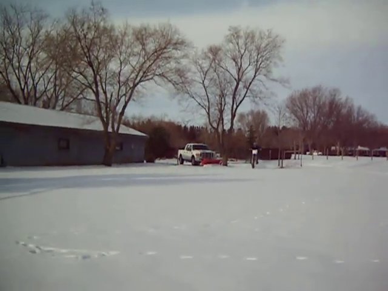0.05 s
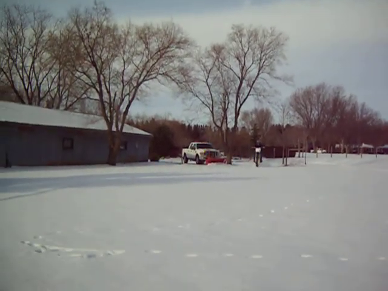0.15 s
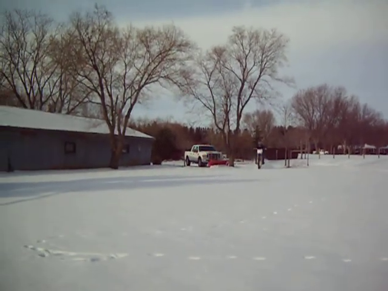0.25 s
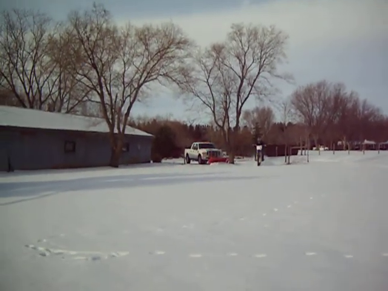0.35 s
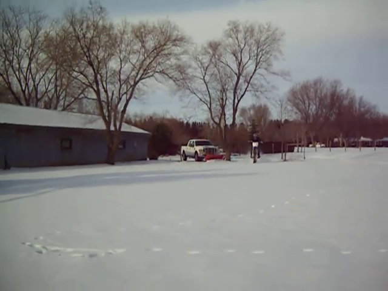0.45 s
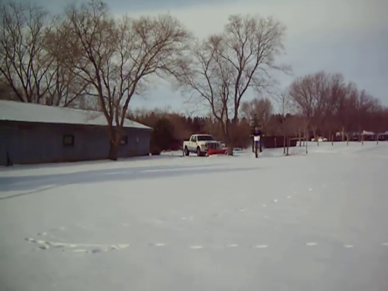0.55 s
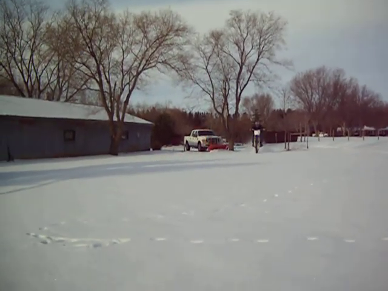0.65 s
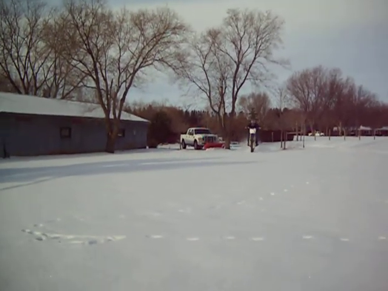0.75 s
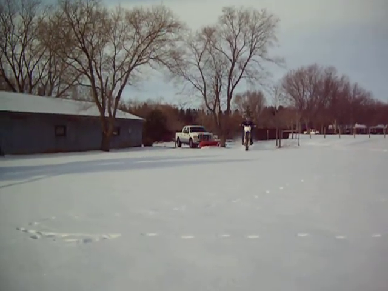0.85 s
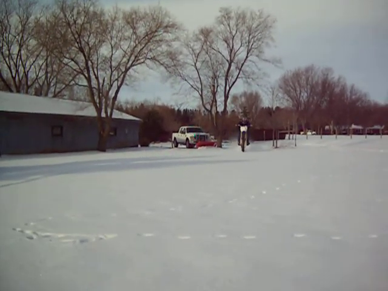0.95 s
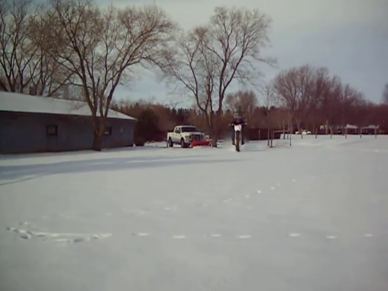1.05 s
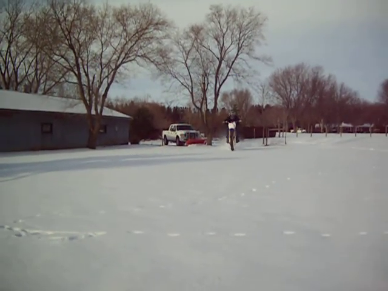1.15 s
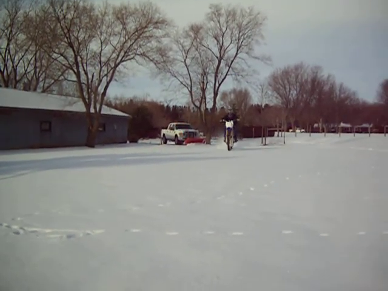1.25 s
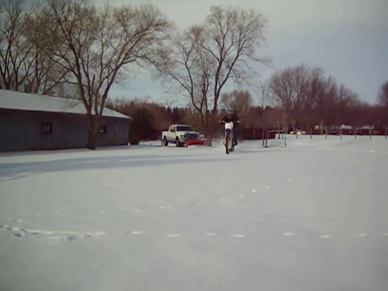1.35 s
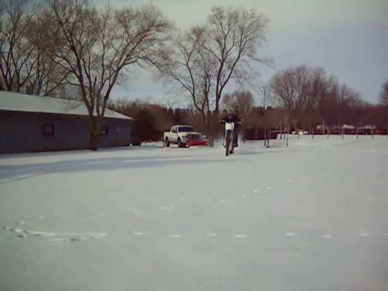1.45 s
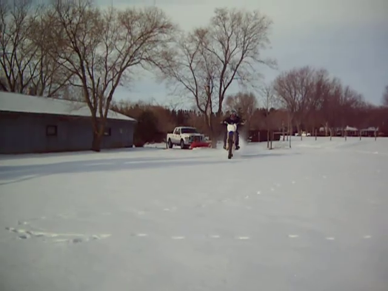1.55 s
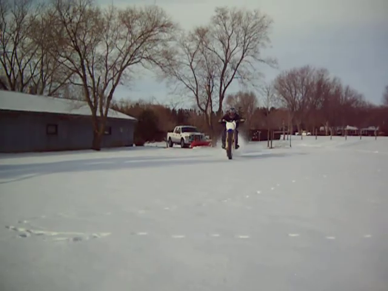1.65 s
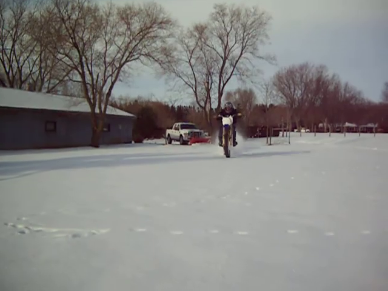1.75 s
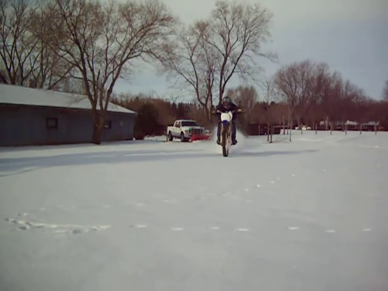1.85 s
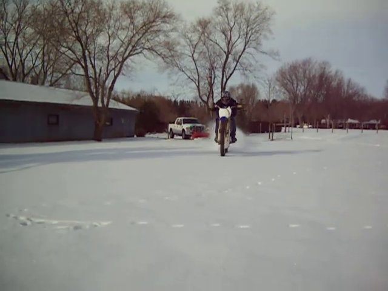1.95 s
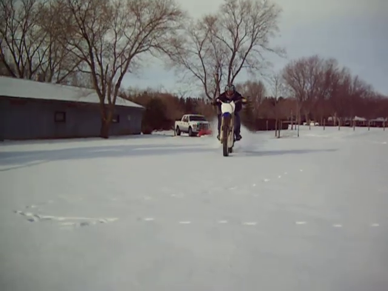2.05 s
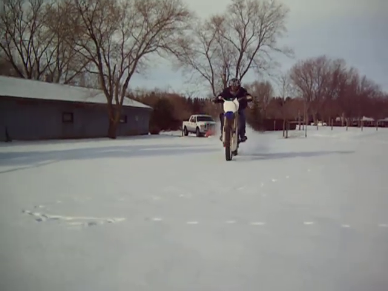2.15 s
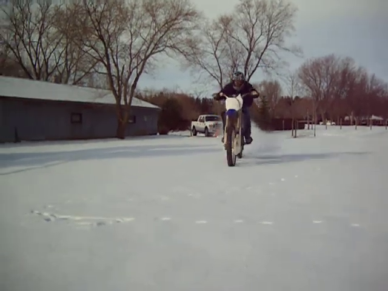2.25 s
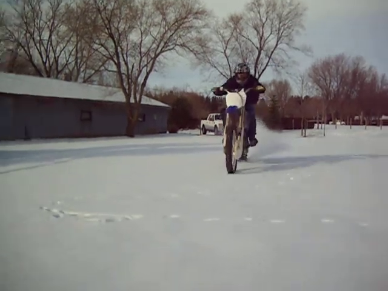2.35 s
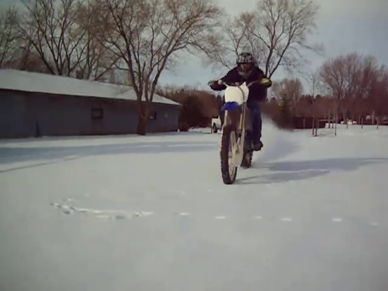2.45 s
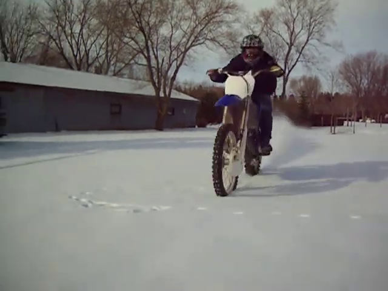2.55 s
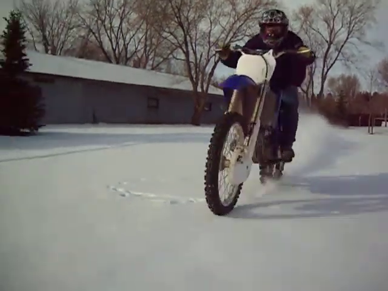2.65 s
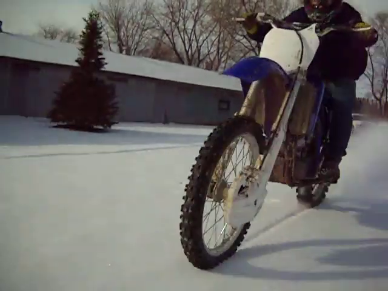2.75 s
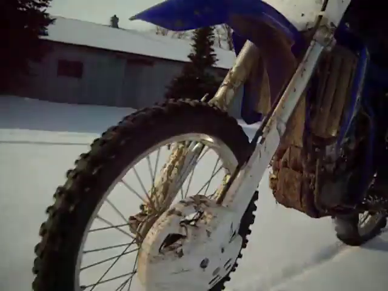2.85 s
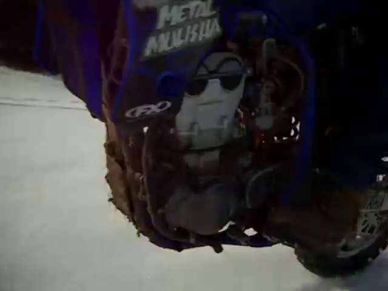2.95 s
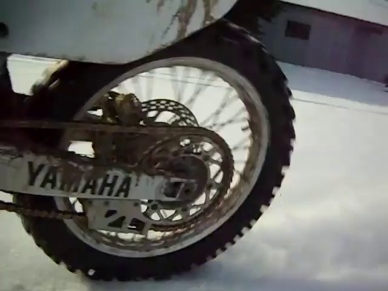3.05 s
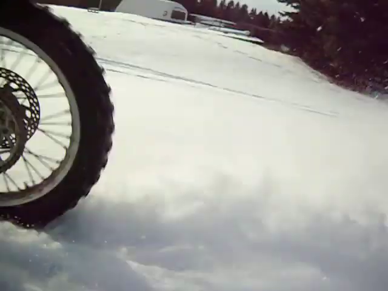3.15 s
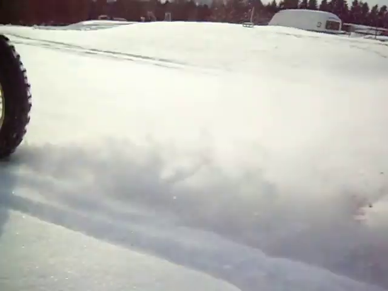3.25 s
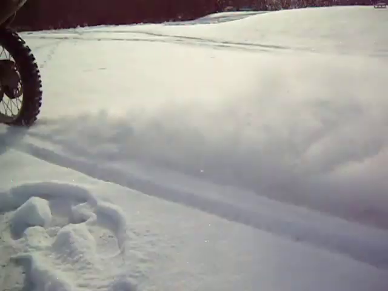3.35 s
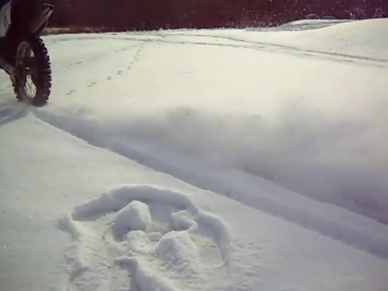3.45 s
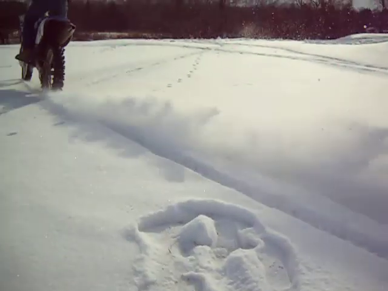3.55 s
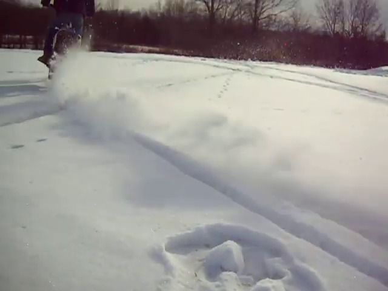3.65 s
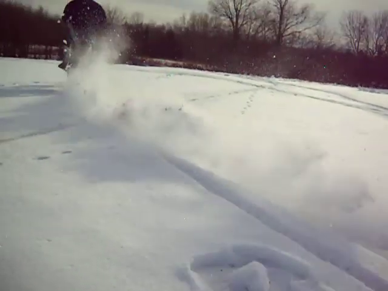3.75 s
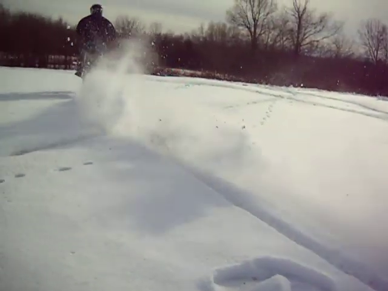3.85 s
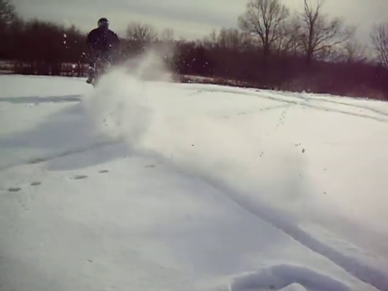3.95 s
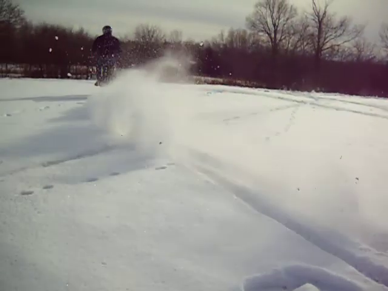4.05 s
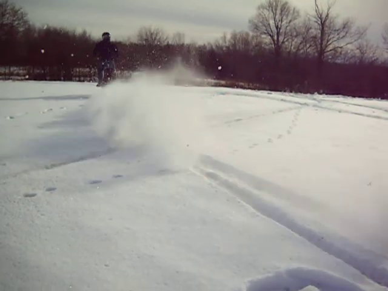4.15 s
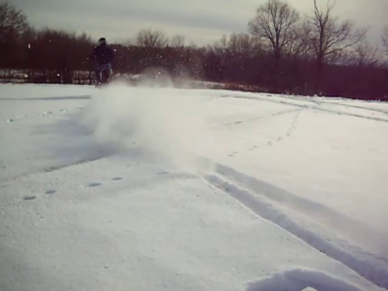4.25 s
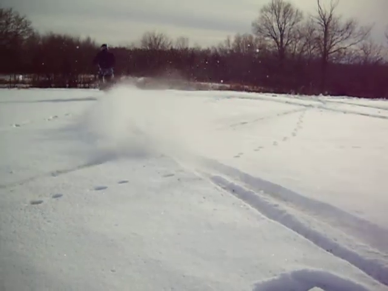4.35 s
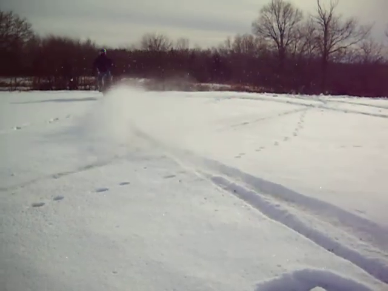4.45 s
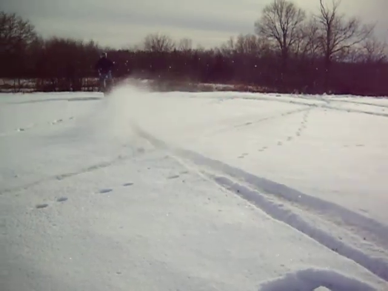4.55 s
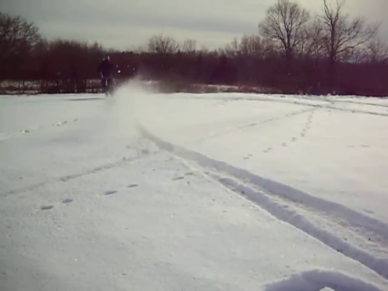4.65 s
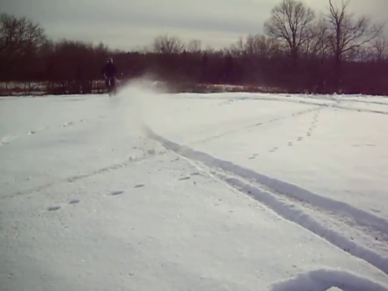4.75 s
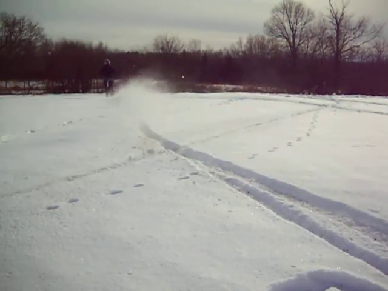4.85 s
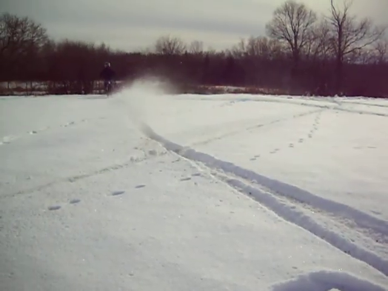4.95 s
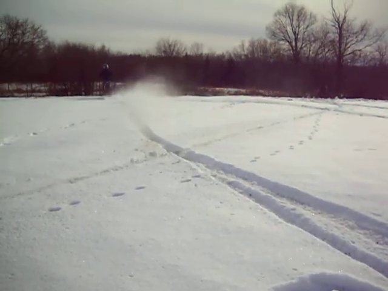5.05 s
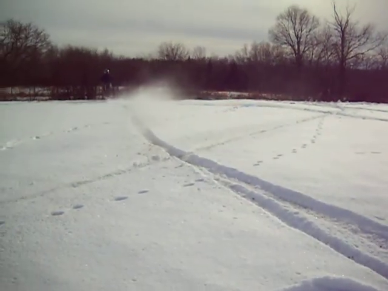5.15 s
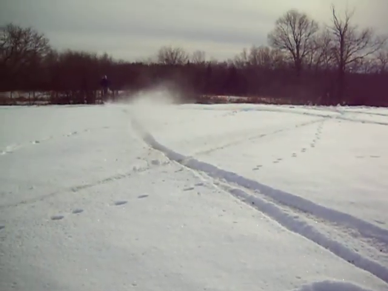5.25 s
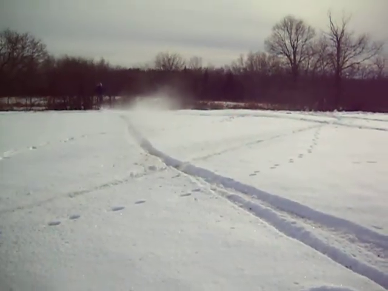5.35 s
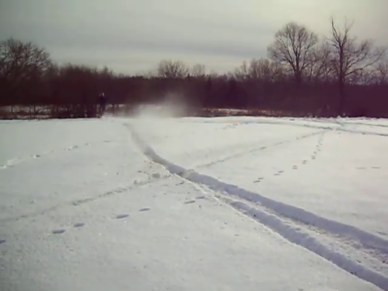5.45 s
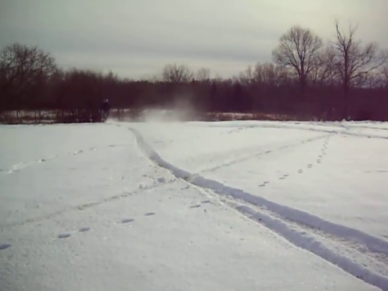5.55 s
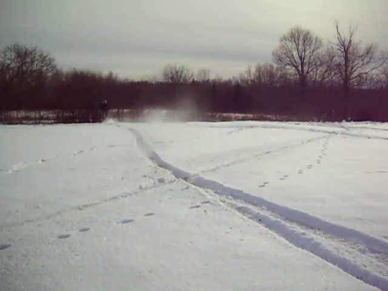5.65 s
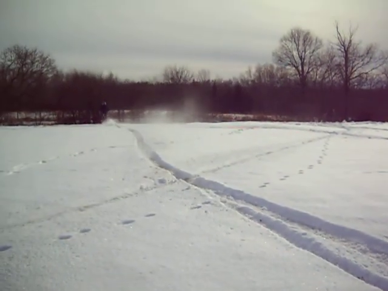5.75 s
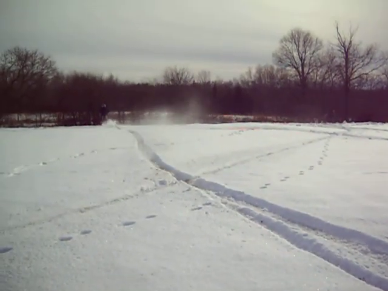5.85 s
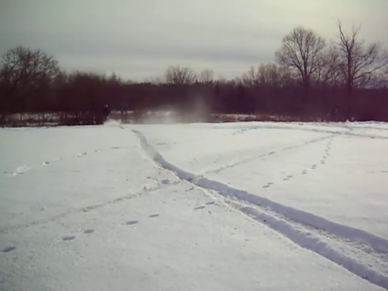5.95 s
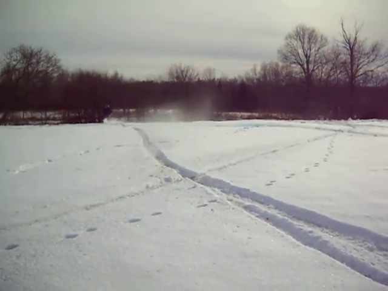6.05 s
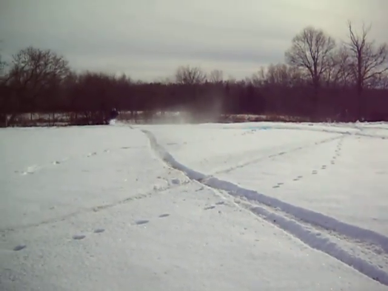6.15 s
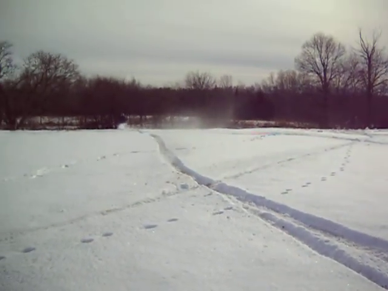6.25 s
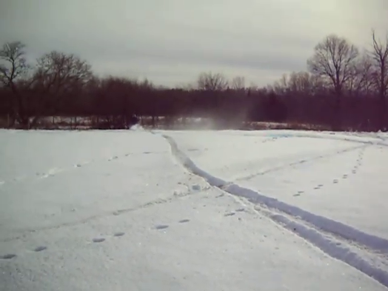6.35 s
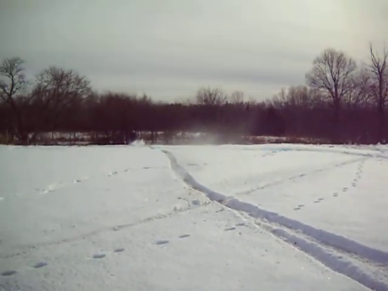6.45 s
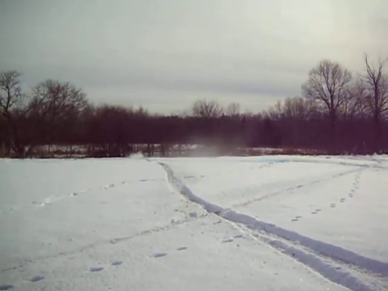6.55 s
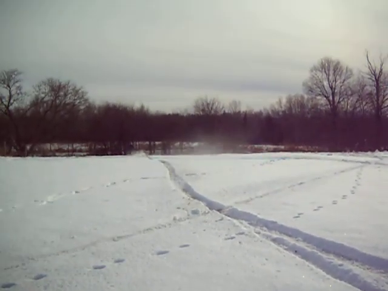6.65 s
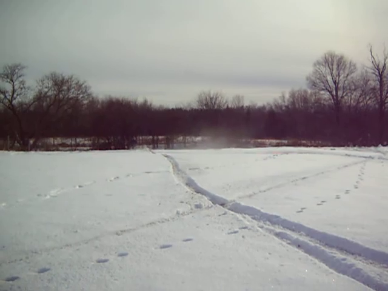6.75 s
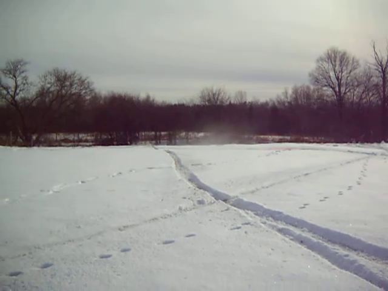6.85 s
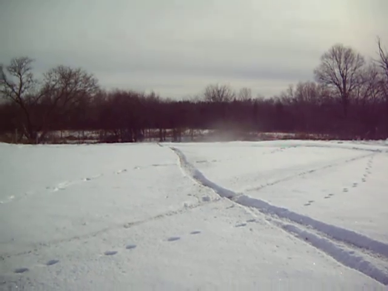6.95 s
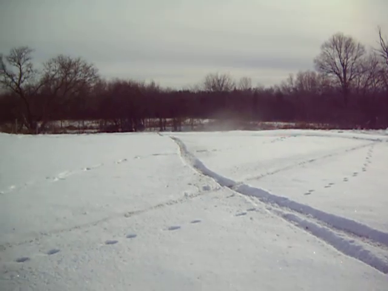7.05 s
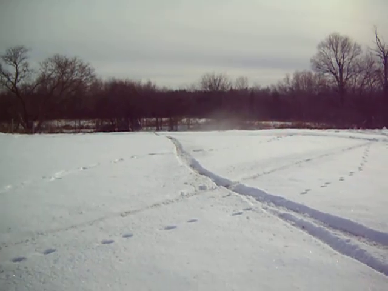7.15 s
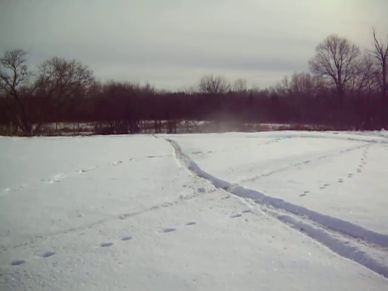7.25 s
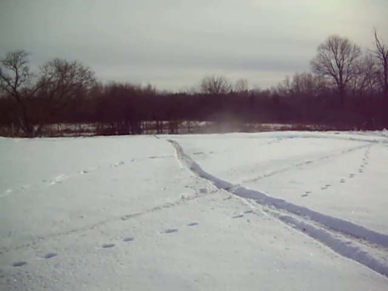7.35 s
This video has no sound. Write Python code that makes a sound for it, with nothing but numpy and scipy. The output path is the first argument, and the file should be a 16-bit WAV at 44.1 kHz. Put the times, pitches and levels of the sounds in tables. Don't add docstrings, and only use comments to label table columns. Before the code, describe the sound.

A single-cylinder dirt bike roars in at full revs across snow, blasts past the microphone in overloaded distortion, recedes, then shuts off and faintly putters away.

```python
import sys
import numpy as np
from scipy import signal
from scipy.io import wavfile
from scipy.ndimage import uniform_filter1d

SR = 44100
rng = np.random.default_rng(int(sys.argv[2]) if len(sys.argv) > 2 else 0)


def store_wav(level_fs):
    pcm = np.round(np.clip(np.atleast_2d(level_fs), -1, 1) * 32767)
    wavfile.write(sys.argv[1], SR, pcm.T.astype(np.int16))


def to_linear_factor(level_db):
    exponent = np.asarray(level_db, float) / 20
    return 10 ** exponent


N = 326781

# start_s, firings_per_s
SPEED = [(0, 99.7), (.6, 95.2), (1.15, 100), (1.37, 106.3), (1.66, 106.3), (2.1, 112.5), (3.06, 113.2),
         (3.27, 101), (4.27, 98.8), (4.45, 106.2), (4.62, 105), (4.9, 91.5), (5.12, 51.3), (5.5, 48),
         (5.85, 19.5), (6.55, 24.5), (6.7, 39.3), (7.41, 33.5)]
# centre_s, half_length_s, firings_per_s
SLIPS = [(.89, .13, 5), (1.86, .05, 2.4), (2.22, .05, 1.5), (2.53, .08, -1.7), (2.8, .08, 1),
         (2.95, .03, -1.1), (3.5, .07, 1), (3.77, .11, -7), (4.0, .1, -2.3), (4.77, .07, -5),
         (4.93, .03, 3), (5.04, .06, -3.5)]
# start_s, length_s, pipe_cough_db
CUTS = [
    (2.755, .022, 2.5),
    (2.889, .022, 11.5),
    (3.463, .022, 5),
    (3.946, .02, 6),
    (4.471, .022, 16),
]
# start_s, level_db
CLOSENESS = [(0, -22), (.65, -20), (1.3, -14), (2.3, -1.5), (2.6, 1.5), (2.82, 14.5), (3.15, 24.5),
             (3.5, 17.5), (3.75, 0), (4.1, -6), (4.45, -6), (4.72, -14), (7.41, -16.5)]
# start_s, level_db
EFFORT = [(0, 1.5), (4.74, -3), (4.84, -8.5), (5.12, -23), (5.3, -21.5), (5.66, -31), (5.83, -49),
          (5.91, -34.5), (6.45, -42), (6.62, -30.5), (6.75, -36.5), (7.41, -39.5)]
# level_db, closeness_share, effort_share
PARTS = [
    (-10, 0.88, 0.26),
    (-16.5, 1.202, 0.62),
    (1.2, 1.1, 1.02),
    (-11, 0.44, 1.127),
    (-21, 1.29, 0.95),
    (-34.5, 1.49, 0.83),
]
# from_behind_db, throttle_shut_db, turned_across_db
BEARING_GAIN = [
    (12, -14, 0),
    (18.5, 1.9, -13),
    (0, -3, -3.5),
    (-3, 0.2, -13),
    (9, -22, -1),
    (18, 7.5, -1.5),
]
# centre_s, level_db
BOOM_DIPS = [(.61, -5), (1.159, -16.5), (1.561, -12.5), (1.88, -7.5), (2.158, -12), (2.548, -9),
             (2.83, -6.5), (3.06, -23.5), (4.031, -4), (4.841, -4.5), (5.12, -14), (5.83, -1), (6.55, -10)]
# centre_s, half_length_s, level_db
PIPE_SWELLS = [(3.05, 0.079, 5), (4.88, .08, -3.5), (5.15, 0.1, 7), (5.28, 0.065, -5), (5.52, 0.21, 6),
               (5.83, 0.071, -1), (7.25, 0.25, 8)]
# start_s, start_hz, end_hz, length_s, roughness_0_to_1
BARK = [(0, 466, 1340, 0.0067, 0.09), (1.2, 490, 1305, 0.0054, 0.54), (2.3, 507.4, 1207, 0.0062, 0.54),
        (2.9, 554, 1022, 0.0063, 0.42), (3.1, 290.5, 827, 0.0055, 0.71), (3.6, 334, 932, .0053, 0.6),
        (4.45, 491, 1110, 0.0051, 0.63), (4.7, 432, 1050, .0047, 0.63), (4.85, 273, 1010, 0.01, 0.54),
        (5.15, 284, 990, 0.0068, 0.77), (5.7, 305, 1026, 0.013, 0.6), (5.9, 310, 533, 0.0072, 0.3),
        (7.41, 330, 565, 0.0021, 0.6)]
# low_hz, high_hz
FRONT_HZ = [527.8, 1092]
# centre_hz, width_hz, level_db
RASP = [(1140, 1280, 9.5), (1895, 440, 10), (2217, 765, 6), (2829, 285, 12.5), (3448, 163, 11)]
# low_hz, high_hz
SPIT_HZ = [2100, 3960]
# start_s, lag_s, level_db
ECHO = [(0, 0.0053, -17.5), (1.2, 0.0052, -5), (2.2, .0043, -17), (2.9, 0.0046, -11), (3.3, 0.002, -40),
        (4.7, .003, -41), (5.0, 0.0066, -7), (7.41, 0.011, 1)]
# start_s, peak_db
CRACKS = [(5.177, -27), (5.213, -29), (5.232, -23), (5.275, -26), (5.289, -21), (5.312, -22),
          (5.331, -24.5), (5.371, -48), (5.864, -49), (5.918, -44), (5.966, -45), (6.015, -58),
          (6.064, -48), (6.112, -49), (6.157, -45), (6.204, -51), (6.545, -42), (6.616, -43), (6.673, -42),
          (6.727, -45)]
# start_s, peak_db, ring_hz
CLICKS = [
    (6.3006, -14, 517),
    (6.3042, -4.5, 2550),
    (6.3083, 2.5, 2000),
    (6.59, -26, 3300),
    (6.593, -25, 2000),
    (6.889, -32.5, 3260),
]
# centre_s, half_length_s, level_db
RUSTLES = [
    (6.369, 0.052, -46),
    (6.455, 0.035, -50),
    (7.001, 0.045, -47),
]
# start_s, level_db
WIND = [(0, -39), (.7, -30.5), (1.5, -34.5), (2.4, -25), (3.3, -36.5), (4.3, -37), (4.6, -40.5),
        (7.41, -53.5)]
# centre_s, half_length_s, lag_s
PORT_LAG = [(3.4, 0.31, 0.001), (4.2, .4, 0.00016)]

PASS_S, SHUT_S, TURN_S, IDLE_S = 2.743, 4.79, 6.8, 5.75
SHUT_BLEND_S, TURN_BLEND_S, DIP_HALF_S = 0.0091, 0.02, 0.062
BOOM_PER_REV, BOOM_REST_HZ, BOOM_TURNED = 0.96, 99.4, 0.87
PIPE_PER_REV, PIPE_REST_HZ = 1.97, 145.3
THROB_PER_REV, THROB_S = 3.1, 0.0073
BARK_LAG_CYCLES = .3
REAR_JITTER_CYCLES, REAR_LIMP_DB = .012, 1.8
CUT_BARK_DB, OVERRUN_CUT_HZ = -10.5, 305
IDLE_CUT_HZ, IDLE_RING = 203, 0.99
SPIT_HALF_S, SPIT_SPREAD_DB = .0008, 5
AIR_DB = -55.5
PORT_CEILING, BAND_EDGE_HZ = 0.72, 3937


def exhaust():
    per_s = in_time(SPEED)[0] + bumps(SLIPS)
    rough = in_time(BARK)[3]
    boom_db, pipe_db, bark_db, rasp_db, throb_db, spit_db = levels()
    boom_db = boom_db + bumps([(s, DIP_HALF_S, db) for s, db in BOOM_DIPS])
    pipe_db = pipe_db + bumps(PIPE_SWELLS)

    boom, pipe, bark, gate, throb, spit = pulse_trains(per_s)
    white = rng.standard_normal((3, N))
    gate = .5 + even(gate)
    bark = even(bark) + rough ** 2 * even(gate * band(white[0], 520, 1150))
    bark = radiated(bark)
    spit = spit / np.sqrt(np.mean(spit ** 2)) * even(band(white[2], *SPIT_HZ))
    rasp = sum(to_linear_factor(db) * band(white[1], hz - wide / 2, hz + wide / 2) for hz, wide, db in RASP)
    boom = even(boom) + .16 * rough * even(band(white[2], 45, 140))
    pipe = even(pipe) + 0.14 * rough * even(band(white[2], 110, 150))

    out = silenced(to_linear_factor(boom_db) * boom + to_linear_factor(pipe_db) * pipe)
    out = out + to_linear_factor(throb_db) * even(throb) + to_linear_factor(spit_db) * spit
    out = out + to_linear_factor(bark_db) * even(echoed(bark))
    return out + to_linear_factor(rasp_db) * even(echoed(gate * rasp))


def pulse_trains(per_s):
    boom_hz = np.maximum(BOOM_PER_REV * per_s, BOOM_REST_HZ) * BOOM_TURNED ** blend(TURN_S, TURN_BLEND_S)
    pipe_hz = np.maximum(PIPE_PER_REV * per_s, PIPE_REST_HZ)
    start_hz, end_hz, length_s, rough = in_time(BARK)
    wander = even(band(rng.standard_normal(N), 10, 25))
    at = firings(per_s * (1 + .005 * wander))
    idle = blend(IDLE_S, .05)
    rear = blend(PASS_S + .3, 0.12) - blend(SHUT_S, SHUT_BLEND_S)
    chance = rng.standard_normal((len(at), 7))
    boom, pipe, bark, gate, throb, spit = trains = np.zeros((6, N))
    for k, (i, c) in enumerate(zip(at, chance)):
        cut_db = [db for s, length, db in CUTS if s <= i / SR < s + length]
        turn = (-1) ** k
        strength = to_linear_factor(rough[i] * c[0] + 0.48 * turn)
        lag_cycles = BARK_LAG_CYCLES * min(per_s[i] / 100, 1) ** 3
        lag_cycles += (.014 + REAR_JITTER_CYCLES * rear[i]) * rough[i] * c[1]
        late = i + int(lag_cycles * SR / per_s[i])
        pitch = 1 + 0.03 * rough[i] * c[2:4]

        thump = sweep(boom_hz[i], boom_hz[i], .012, 0.017 * IDLE_RING ** idle[i], 0.003)
        add(boom, i, strength * to_linear_factor(3.4 * turn) * thump)

        ring_hz = pipe_hz[i] * (.8 if cut_db else 1)
        add(pipe, i, strength * to_linear_factor(sum(cut_db)) * sweep(ring_hz, pipe_hz[i] * .92, 0.015, 0.018, 0.0018))

        throb_hz = THROB_PER_REV * per_s[i]
        add(throb, i, strength * sweep(throb_hz, throb_hz, THROB_S, THROB_S, .002))

        flame = np.exp(-((np.arange(600) / SR - .9 * length_s[i]) / SPIT_HALF_S) ** 2)
        add(spit, late, to_linear_factor(SPIT_SPREAD_DB * min(c[6], 2)) * flame)

        chirp_db = CUT_BARK_DB * len(cut_db) + REAR_LIMP_DB * rear[i] * turn + 3.85 * rough[i] * c[4]
        chirp = sweep(start_hz[i] * pitch[0], end_hz[i] * pitch[1], length_s[i], length_s[i], 0.00022)
        add(bark, late, strength * to_linear_factor(chirp_db) * chirp)

        puff = np.exp(-((np.arange(900) / SR / length_s[i] - .7) / 0.84) ** 2)
        add(gate, late, strength * to_linear_factor(0.43 * rough[i] * c[5]) * puff)
    return trains


def firings(per_s):
    turns = np.cumsum(per_s) / SR
    at = (np.array(CRACKS)[:, 0] * SR).astype(int)
    turns += np.interp(np.arange(N), at, np.round(turns[at]) - turns[at])
    return np.flatnonzero(np.diff(np.floor(turns)) > 0)


def radiated(bark):
    behind = blend(PASS_S, 0.066)
    forward = signal.sosfilt(signal.cheby1(3, 2.5, FRONT_HZ, "band", fs=SR, output="sos"), bark)
    ahead = forward + 0.26 * bark + 0.64 * band(bark, 839, 1170)
    bark = (1 - behind) * ahead + behind * bark
    shut = blend(SHUT_S, SHUT_BLEND_S)
    overrun = signal.sosfilt(signal.butter(6, OVERRUN_CUT_HZ, "high", fs=SR, output="sos"), bark)
    return (1 - shut) * bark + shut * overrun


def silenced(lows):
    lows = signal.sosfiltfilt(signal.butter(8, 238, fs=SR, output="sos"), lows)
    dull = signal.sosfiltfilt(signal.butter(6, IDLE_CUT_HZ, fs=SR, output="sos"), lows)
    idle = blend(IDLE_S, .05)
    return (1 - idle) * lows + idle * dull


def echoed(x):
    lag_s, db = in_time(ECHO)
    return x + to_linear_factor(db) * np.interp(np.arange(N) - lag_s * SR, np.arange(N), x)


def levels():
    (near_db,), (effort_db,) = in_time(CLOSENESS), in_time(EFFORT)
    turns = blend(PASS_S, 0.13), blend(SHUT_S, SHUT_BLEND_S), blend(TURN_S, TURN_BLEND_S)
    return [db + near * near_db + work * effort_db + sum(g * t for g, t in zip(gains_db, turns))
            for (db, near, work), gains_db in zip(PARTS, BEARING_GAIN)]


def cracks():
    out = np.zeros(N)
    for s, db in CRACKS:
        add(out, int(s * SR), to_linear_factor(db + 1.0) * sweep(870, 299, 0.01, 0.01, 0.000145))
    return signal.sosfilt(signal.butter(4, 280, "high", fs=SR, output="sos"), out + 1e-18)


def housing():
    out, t = np.zeros(N), np.arange(400) / SR
    for s, db, hz in CLICKS:
        cycles = t * hz - .6
        snap = np.exp(-(cycles / .55) ** 2) * np.cos(2 * np.pi * cycles)
        ring = np.exp(-t / 0.0008) * np.sin(2 * np.pi * 1.1 * hz * t)
        add(out, int(s * SR), to_linear_factor(db) * (snap + 0.56 * ring))
    return out


def rustles():
    swell = bumps([(s, half_s, to_linear_factor(db)) for s, half_s, db in RUSTLES])
    return swell * even(band(rng.standard_normal(N), 940, 2230))


def field():
    air, wind = rng.standard_normal((2, N))
    hiss = even(band(band(air, 290, 3200), 270, 3500))
    return to_linear_factor(AIR_DB) * hiss + to_linear_factor(in_time(WIND)[0]) * even(band(wind, 3.3, 140))


def in_time(rows):
    s, *columns = np.transpose(rows)
    return [np.interp(np.arange(N) / SR, s, c) for c in columns]


def blend(s, over_s):
    return 1 / (1 + np.exp(np.clip((s - np.arange(N) / SR) / over_s, -50, 50)))


def bumps(rows):
    return sum(high * np.exp(-((np.arange(N) / SR - s) / half_s) ** 2) for s, half_s, high in rows)


def band(x, low_hz, high_hz):
    return signal.sosfilt(signal.butter(2, [low_hz, high_hz], "band", fs=SR, output="sos"), x)


def even(x):
    power = uniform_filter1d(uniform_filter1d(x ** 2, size=4400), size=4400)
    return x / np.sqrt(power + 1e-12)


def add(out, at, burst):
    out[at:at + len(burst)] += burst[:max(len(out) - at, 0)]


def sweep(start_hz, end_hz, length_s, decay_s, rise_s):
    t = np.arange(int(3 * length_s * SR)) / SR
    hz = start_hz + (end_hz - start_hz) * np.minimum(t / length_s, 1)
    envelope = (1 - np.exp(-(t / rise_s) ** 2)) * np.exp(-(t / decay_s) ** 3)
    return np.sin(2 * np.pi * np.cumsum(hz) / SR) * envelope


def scene():
    return (exhaust() + cracks() + housing() + rustles() + field())[None]


def ports(dry):
    low = signal.sosfiltfilt(signal.butter(2, 260, fs=SR, output="sos"), dry[0])
    late = np.interp(np.arange(N) - SR * bumps(PORT_LAG), np.arange(N), low)
    first = np.clip(dry, -PORT_CEILING, PORT_CEILING)
    second = np.clip(dry + late - low, -PORT_CEILING, PORT_CEILING)
    return (first + second) / 2


def low_pass(x):
    return signal.sosfilt(signal.butter(12, 16070, fs=SR, output="sos"), x)


def record(dry):
    clipped = ports(dry)
    narrow = signal.sosfiltfilt(signal.cheby1(9, .3, BAND_EDGE_HZ, fs=SR, output="sos"), clipped)
    narrow = narrow - narrow.mean()
    mix = np.clip(narrow, -.7, .7)
    return low_pass(mix)


dry = scene()
out = record(dry)
store_wav(out)
```